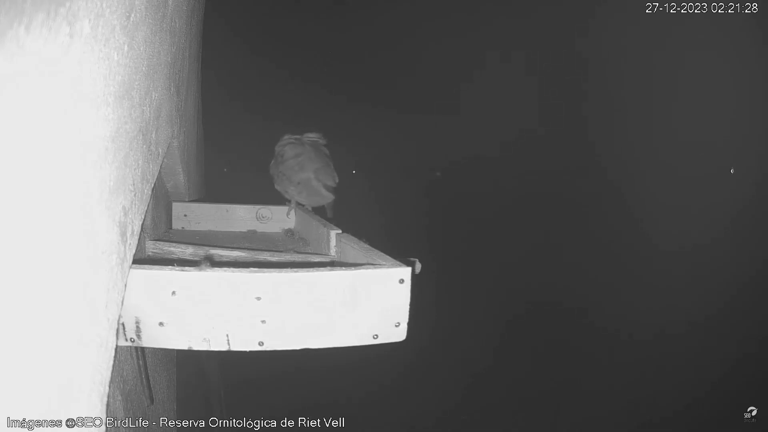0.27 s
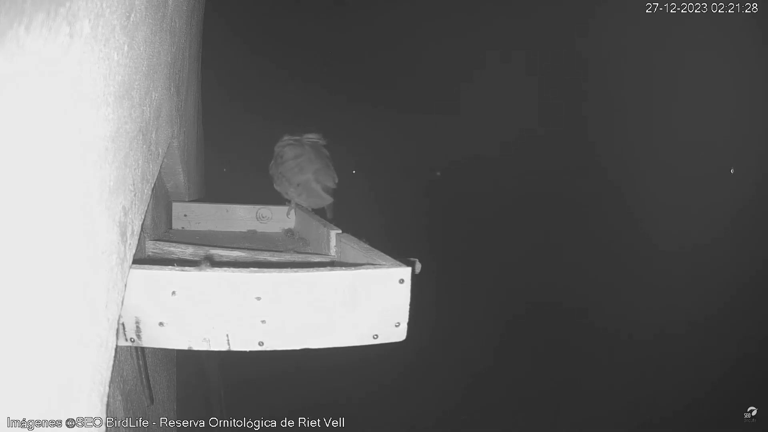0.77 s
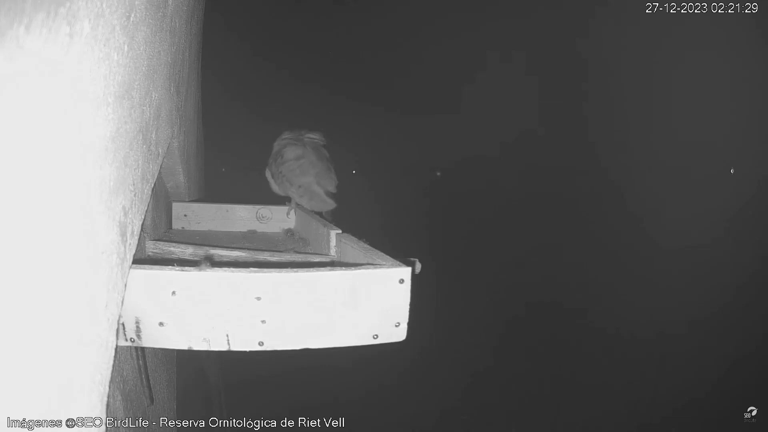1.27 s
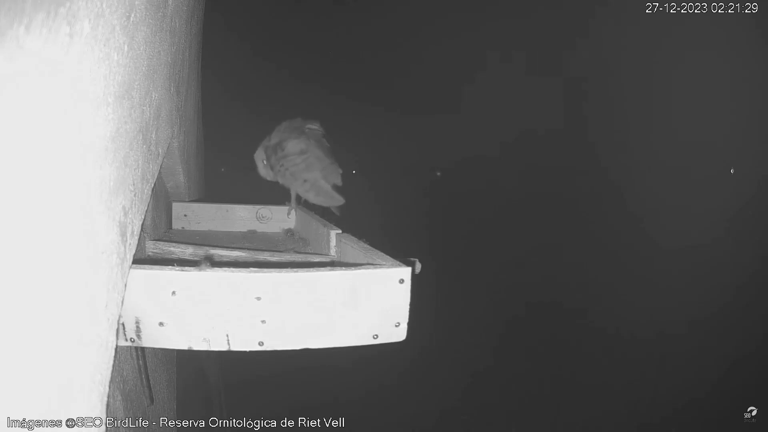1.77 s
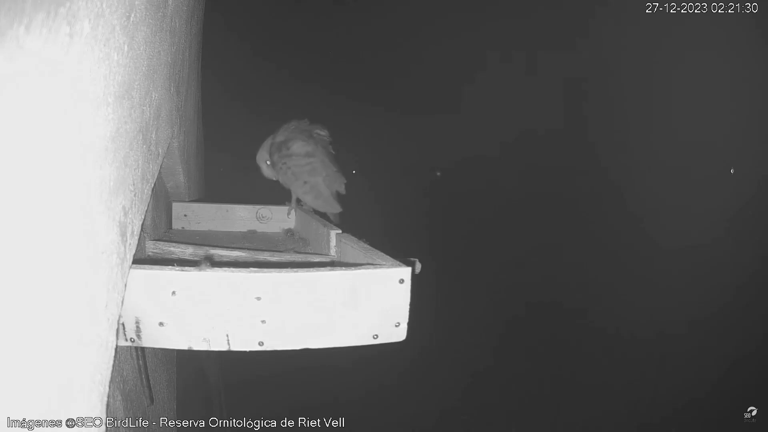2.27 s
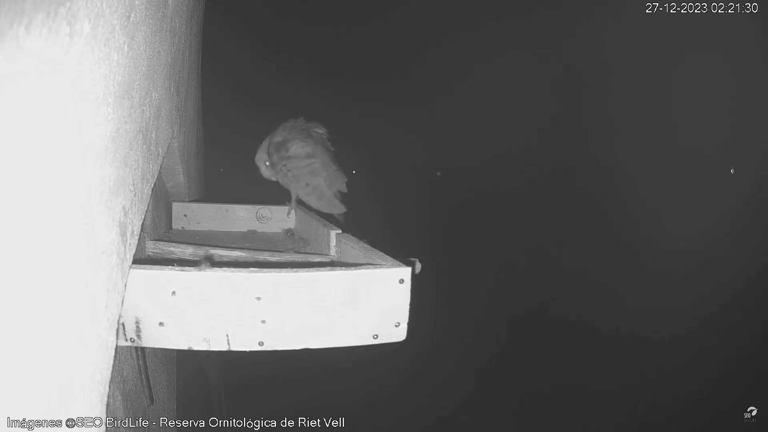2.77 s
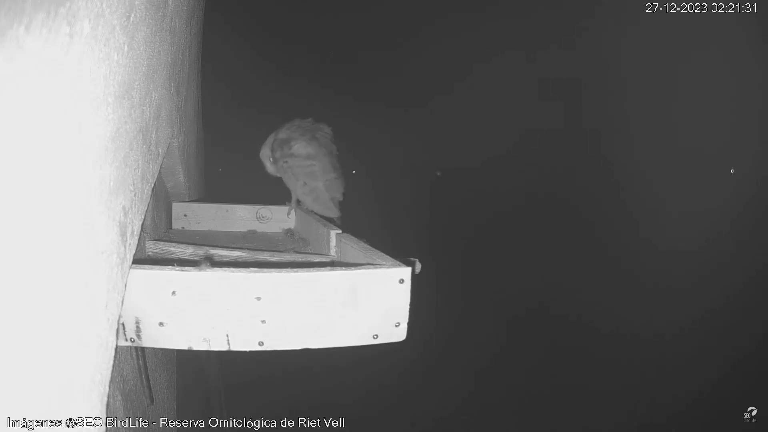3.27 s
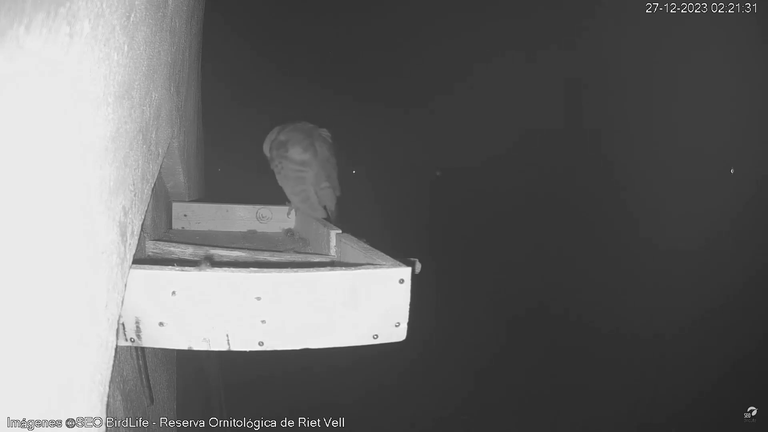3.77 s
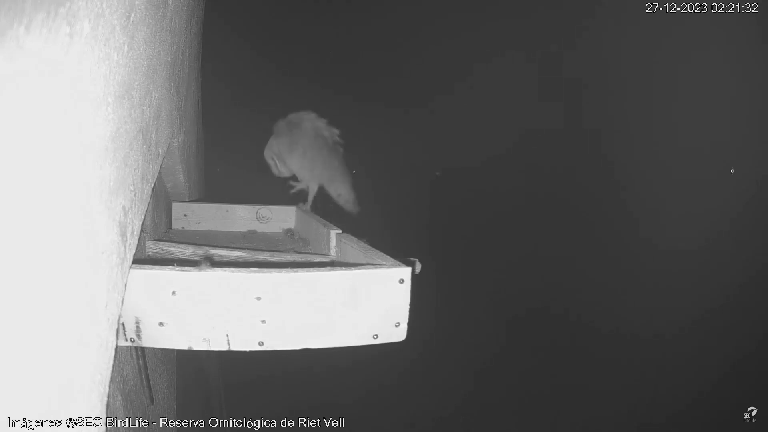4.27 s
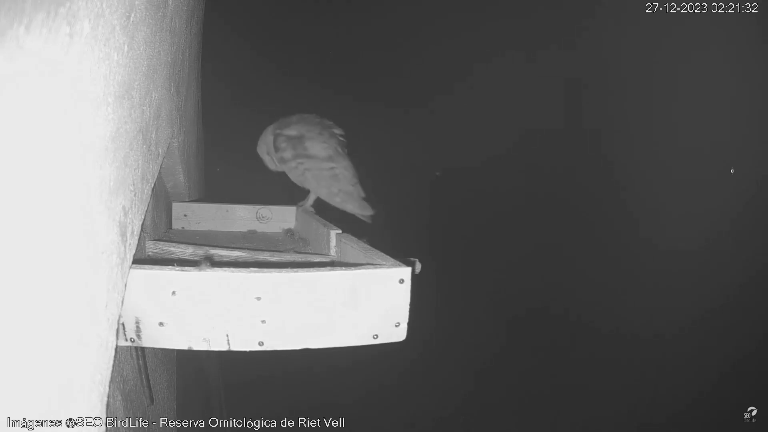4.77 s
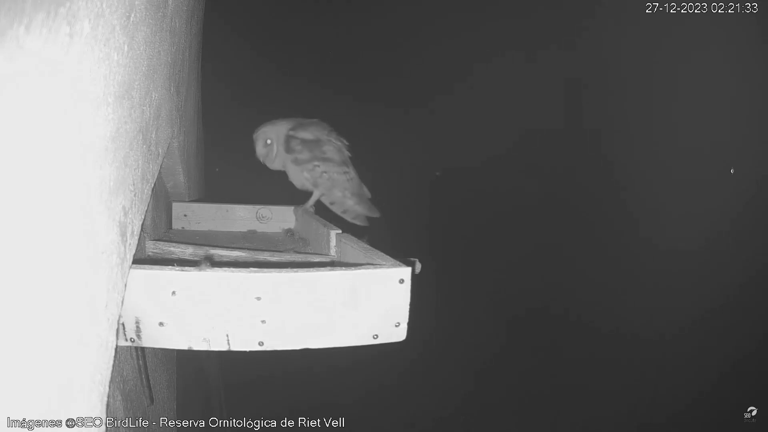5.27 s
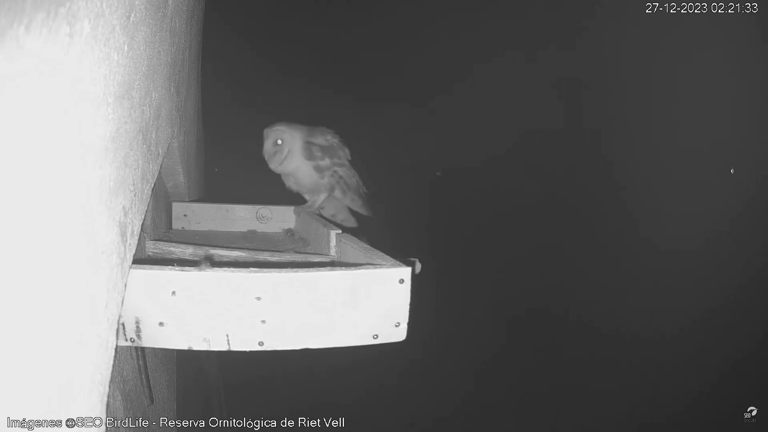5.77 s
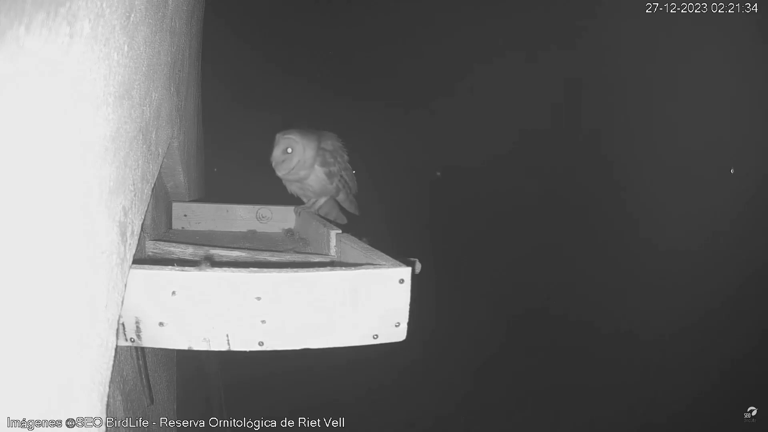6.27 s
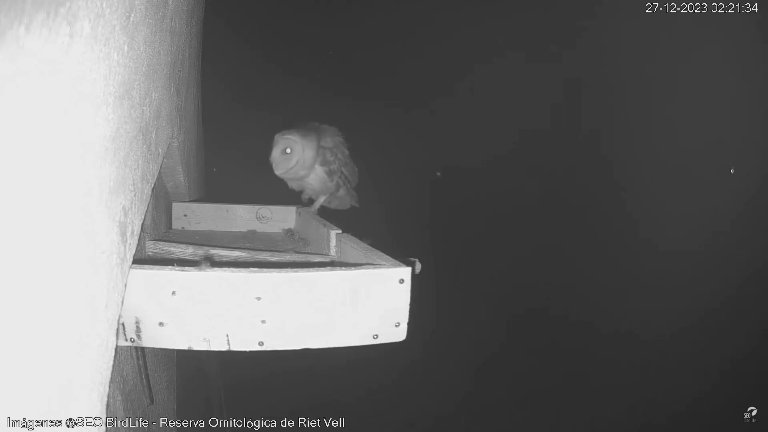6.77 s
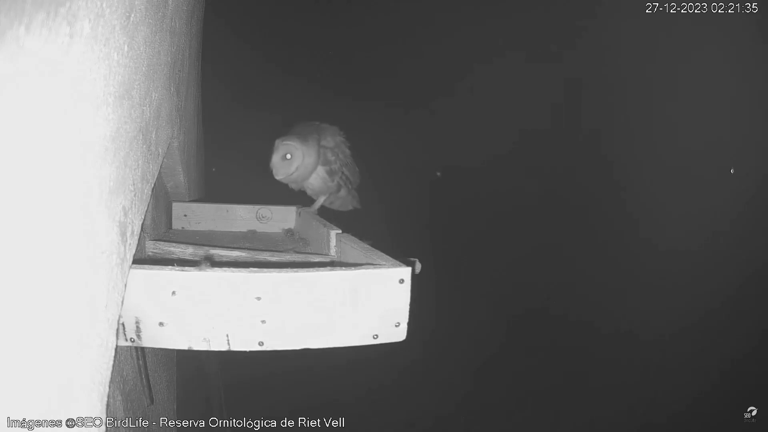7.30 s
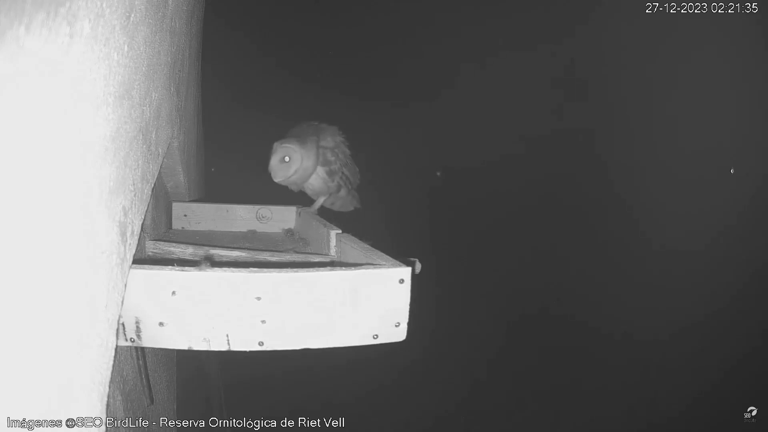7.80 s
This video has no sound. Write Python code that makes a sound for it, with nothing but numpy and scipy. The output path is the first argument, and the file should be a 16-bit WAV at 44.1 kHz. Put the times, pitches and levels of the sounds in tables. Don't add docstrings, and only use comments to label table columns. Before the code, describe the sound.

A small mono camera microphone at a wooden nest box at night: steady soft electronic hiss, very low rumble and barely stirring air, with close dry box reflections. At 0.5 s a barn owl gives a breathy, rasping begging hiss of about half a second. Faint squeaks and claw scratches follow, then a weaker hiss at 2.4 s. A light knock comes near 3 s and a sharp tick at 3.2 s. From 3.3 to 4.1 s another owl gives a thin, airy, fluttering whistle-screech; a duller begging hiss overlaps from 3.9 to 4.6 s. Wood knocks at 4.2 s and more loudly at 4.6 s, with tiny creaks around 5.1 s. From 5.2 s a long harsh screech swells, throbbing rapidly, loudest and shrillest near 6.6 s, cutting off at 6.8 s. A box thump and fourth hiss sit under it at 5.75 s. After a quiet gap, the strongest begging hiss comes at 7.7 s, with slight squeaks.

```python
import sys
import numpy as np
from scipy import signal
from scipy.fft import rfft, irfft, next_fast_len
from scipy.io import wavfile
from scipy.ndimage import uniform_filter1d

SR = 44100
rng = np.random.default_rng(int(sys.argv[2]) if len(sys.argv) > 2 else 0)


def rack_gain(trim_db):
    fader = np.asarray(trim_db, float)
    return 10 ** (fader / 20)


def pcm_store(signal):
    levels = np.round(np.clip(np.atleast_2d(signal), -1, 1) * 32767)
    wavfile.write(sys.argv[1], SR, levels.astype(np.int16).T)


N = 354519

# pitch_hz, level_db (per Hz)
RUMBLE_SPECTRUM = [(2, -8), (5, 3), (10, 1), (17, -4), (26, -14.5), (36, -20), (50, -27), (90, -36),
                   (200, -52), (500, -77)]
STIR_SPECTRUM = [(60, -23), (150, -3), (300, -2), (600, -7), (1200, -12.5), (3000, -31.5)]
AMPLIFIER_SPECTRUM = [(5, 23.5), (17, 25.5), (28, 16), (60, 8), (130, 10), (400, 0.5), (1400, 1),
                      (20000, -1)]
# start_s, length_s, effort_db, swell_s, beak_open_db
BEGGING = [
    (0.521, 0.55, -33, .17, -3.5),
    (2.402, 0.6, -39.5, 0.085, -3),
    (5.75, 0.53, -35.5, 0.071, 1),
    (7.703, 0.59, -32.5, 0.076, -3),
]
TURNED_BEGGING = (3.89, 0.715, -34.5, 0.2, -14)
# pitch_hz, width_hz, level_db
FACING_MODES = [
    [(630, 340, -1.5), (1065, 400, 3.5), (1320, 650, 0)],
    [(1970, 500, -16.5), (2600, 520, -13.5), (3193, 940, -7), (3533, 670, -2), (3900, 330, -5.5)],
    [(4430, 530, -9), (4785, 700, -2.5), (5670, 410, -22)],
    [(6290, 400, 4), (6820, 710, -2.5), (7460, 350, -12.5)],
]
AWAY_MODES = [
    [(603, 240, -4), (1090, 930, 0.014), (1420, 240, 0)],
    [(1970, 710, -12), (2593, 590, -3.5), (3095, 610, -2), (3530, 540, -1), (3860, 500, -7.5)],
    [(4650, 1200, 1), (4910, 610, -15.5), (5580, 170, -5)],
    [(6250, 450, 2.5), (6840, 390, -5), (7300, 350, -16.5)],
]
# usual_db, extra_effort_share, swell_share, openness_share, early_stop_s
BREATH_RESPONSE = [
    (-52, 0.05, .85, -0.21, -.025),
    (-35, 0.91, 1.13, 0.029, 0.0059),
    (-35, 0.94, 1.8, 0.98, 0.01),
    (-57.5, .6, 3.2, .2, -0.0022),
]
# start_s, length_s,
# pitch_hz, level_db
SQUEAKS = [(4.786, 0.073, 1780, -72.5), (4.811, 0.056, 840, -72), (4.827, .02, 3600, -81),
           (5.104, 0.022, 1434, -61), (5.108, 0.017, 3050, -79), (5.12, 0.049, 1490, -65.5),
           (5.142, 0.049, 1800, -62), (5.15, 0.054, 937, -58.5), (3.201, 0.016, 2750, -64),
           (7.7, .04, 1900, -57), (7.71, .09, 700, -60), (1.164, 0.035, 310, -75), (1.297, 0.06, 259, -70)]
# start_s, box_thump_db, plank_db, knock_db, tick_db
TAPS = [
    (1.833, -89, -60, -59.5, -56.5),
    (2.268, -114, -59, -69, -60.5),
    (2.975, -96, -55, -51, -66),
    (3.217, -53.5, -63.5, -57.5, -37.5),
    (3.583, -80, -59.5, -50, -59),
    (3.796, -58.5, -55, -58, -77),
    (4.18, -81, -43.5, -48.5, -70),
    (4.568, -57.5, -39.5, -55, -70.5),
    (5.06, -80, -67, -58, -54.5),
    (5.755, -48.5, -70, -67, -53),
]
BOX_NOTE = .006, .14, 242
PLANK = .007, .11, [(330, 120, -14), (560, 110, 0), (720, 130, -1), (970, 120, -1)]
KNOCK = .005, .07, [(1250, 250, -4), (1520, 200, -2), (1810, 200, 0), (2300, 300, -8)]
TICK = .0025, .024, [(2750, 220, -7), (3300, 300, -4), (3640, 300, 0), (3950, 300, -7)]
# time_s, effort_db, upper_resonances_db (relative to effort)
THIN_COURSE = [
    (3.25, -78, -15),
    (3.272, -62, -25),
    (3.298, -48, -10),
    (3.348, -36, -18.5),
    (3.58, -28.5, -22.5),
    (3.7, -31, -20),
    (3.78, -28.5, -21),
    (4.08, -31, -25.5),
    (4.12, -59, -12.5),
]
# pitch_hz, width_hz, level_db
THIN_CORE = [(973, 480, -49.5), (1950, 590, -44.5), (2700, 350, -33.5), (3050, 190, -11), (3254, 240, -3.5),
             (3534, 320, -14), (3856, 66, -10.5), (4270, 1000, -24.5), (4554, 52, -8)]
THIN_TOP = [(5040, 290, -2), (5500, 190, -3), (6000, 130, 3), (6200, 790, -8), (6800, 330, -8),
            (7360, 180, -7.5)]
# time_s, effort_db, stage (0 start, 1 swell, 2 full cry), shrillness_db
CRY_COURSE = [
    (5.163, -70, 0., -9),
    (5.19, -46.5, 0, -9.5),
    (5.4, -39, 0.58, -18),
    (5.56, -24.5, 0.99, 2.5),
    (5.76, -24.5, 1.07, -4.5),
    (5.95, -24, 1.48, -1),
    (6.3, -25.5, 1.78, -7),
    (6.6, -19.5, 1.745, 5),
    (6.84, -22.5, 1.76, 6),
]
# pitch_hz, width_hz, start_db, swell_db, full_cry_db
CRY_MODES = [(565.3, 433, -17.5, -30, -33), (883, 350, -8, -34.5, -27.5), (1220, 380, -7.5, -24.5, -17),
             (1560, 620, -1, -19.5, -35.5), (1929, 246, -10, -12.5, 6.5), (2064, 212, -15, 0.5, -9.5),
             (2417, 320, -9, 2, -14), (2693, 830, -10, -12, -13.5), (3265, 770, -12.5, -7.5, -20),
             (3730, 316, -5.5, -11.5, -7.5), (5160, 610, -62, -67.5, -30), (5350, 910, -52, -39.5, -40.5),
             (6135, 540, -42, -49.5, -37.5)]
# time_s, rate_hz
THROB_RATE = [(5.16, 62.16), (5.4, 61.53), (5.6, 58.67), (5.8, 55.67), (6.0, 54.17), (6.2, 51.62),
              (6.4, 55.59), (6.6, 50.23), (6.84, 50.93)]
# time_s, level_db (above the neighbours)
ACCENTS = [(5.72, -4), (5.989, 4), (6.028, 3), (6.16, 4), (6.217, 4), (6.235, 4), (6.256, -3), (6.275, 4),
           (6.386, 3), (6.403, 4), (6.438, -4), (6.458, 4), (6.476, 5), (6.515, -3), (6.535, -2),
           (6.572, 1), (6.59, 2), (6.729, -6), (6.749, 4), (6.769, -5), (6.789, 3), (6.81, 5), (6.83, -8)]
# delay_s, level_db
WALL_ECHOES = [(.0006, -25.5), (.0013, -21.5), (.0023, -27), (.0083, -19), (.066, -45)]


def evened(x):
    return x / np.sqrt(np.mean(x ** 2) + 1e-20)


def coloured(x, spectrum):
    size = next_fast_len(N, True)
    hz = np.fft.rfftfreq(size, 1 / SR)
    point_hz, point_db = np.transpose(spectrum)
    gain = rack_gain(np.interp(np.log(hz + 1), np.log(point_hz + 1), point_db))
    return evened(irfft(rfft(x, size) * gain, size)[..., :N])


def add(mix, s, sound):
    part = mix[round(s * SR):][:len(sound)]
    part += sound[:len(part)]


def slow(n, hz):
    lowpass = signal.butter(2, hz, fs=SR, output="sos")
    return evened(signal.sosfilt(lowpass, rng.standard_normal(n + 4000))[4000:])


def tract(x, modes, steep=0.65, patchy_db=1.5):
    hz, _, z = signal.stft(x, SR, nperseg=1024, noverlap=768)
    power = 0
    for f, width, db in modes:
        skirt = (1 + (2 * (hz[:, None] - f) / width) ** 2) ** (2 * steep)
        power = power + rack_gain(2 * np.atleast_1d(db)) / skirt
    patches = uniform_filter1d(rng.standard_normal(z.shape), size=3, axis=0)
    patches = evened(uniform_filter1d(patches, size=7, axis=1))
    gain = np.sqrt(power / power.mean(axis=0)) * rack_gain(patchy_db * patches)
    return signal.istft(z * gain, SR, nperseg=1024, noverlap=768)[1][:len(x)]


def curves(rows):
    s, *columns = np.transpose(rows)
    t = np.arange(s[0], s[-1], 1 / SR)
    return t, [np.interp(t, s, c) for c in columns]


def rumble():
    rumble_db, stir_db = -54, -77
    lumps = rng.standard_normal(N) * rack_gain(2.5 * slow(N, hz=10))
    drift = rack_gain(rumble_db) * coloured(rng.standard_normal(N), RUMBLE_SPECTRUM)
    return drift + rack_gain(stir_db) * coloured(lumps, STIR_SPECTRUM)


def amplifier_hiss(shape):
    return rack_gain(-68.5) * coloured(rng.standard_normal(shape), AMPLIFIER_SPECTRUM)


def begging_hiss(start, length, effort_db, swell_s, open_db, groups):
    usual_db, start_db, onset_s, fade_s = -35, -13.5, .019, .034
    t = np.arange(0, length + .05, 1 / SR)
    air = rng.standard_normal(len(t)) * rack_gain(0.37 * slow(len(t), hz=121))
    out = np.zeros(len(t))
    for (db, extra, swell, opening, early_s), modes in zip(BREATH_RESPONSE, groups):
        level_db = db + extra * (effort_db - usual_db) + opening * open_db
        level_db = level_db + swell * start_db * np.exp(-t / swell_s)
        level_db -= 30 * np.exp((t - length + early_s) / fade_s)
        out += rack_gain(level_db) * evened(tract(air, modes, steep=1.9, patchy_db=2.2))
    return start, out * np.minimum(t / onset_s, 1) ** 2


def squeak(s, length, hz, db):
    n = round(length * SR)
    pitch = hz * (1 + 0.039 * slow(n, hz=150))
    tone = np.sin(2 * np.pi * np.cumsum(pitch) / SR)
    return s, rack_gain(db) * 1.7 * tone * np.hanning(n)


def tap(s, thump_db, plank_db, knock_db, tick_db):
    t = np.arange(9000) / SR
    stretch = 2.2 if tick_db < -46 else 1
    tick = stretch * TICK[0], stretch * TICK[1], TICK[2]
    parts = [(*BOX_NOTE[:2], np.sin(2 * np.pi * BOX_NOTE[2] * t))]
    for rise, t60, modes in (PLANK, KNOCK, tick):
        parts.append((rise, t60, tract(rng.standard_normal(len(t)), modes, steep=1.5)))
    out = np.zeros(len(t))
    for db, (rise, t60, sound) in zip((thump_db, plank_db, knock_db, tick_db), parts):
        part = sound * (1 - np.exp(-(t / rise) ** 2)) * rack_gain(-60 * t / t60)
        out += rack_gain(db) * 1.47 * part / abs(part).max()
    return s - .003, out


def thin_screech():
    t, (effort_db, top_db) = curves(THIN_COURSE)
    flutter_hz, flutter_depth = 57 * (1 + 0.12 * slow(len(t), hz=15)), 0.38
    flutter = np.cos(2 * np.pi * np.cumsum(flutter_hz) / SR)
    spurts_db = 4.4 * flutter_depth * flutter + 1.5 * slow(len(t), hz=45)
    air = evened(rng.standard_normal(len(t)) * rack_gain(spurts_db))
    frame_s = signal.stft(t, SR, nperseg=1024, noverlap=768)[1]
    opening = np.exp(-(frame_s / .06) ** 2)
    modes = []
    for f, width, db in THIN_CORE:
        shift_db = 20 * (2500 < f < 2900) - 9 * (3150 < f < 3350)
        modes.append((f, width, db + opening * shift_db))
    core = evened(tract(air, modes, steep=1.8))
    swing = uniform_filter1d(abs(signal.hilbert(core)), size=60)
    core = evened(core / (1 + (swing / 1.7) ** 2) ** .36)
    top = evened(tract(air, THIN_TOP))
    return t[0], rack_gain(effort_db) * core + rack_gain(effort_db + top_db) * top


def throbs(t, effort_db):
    first_s, jitter_ms, scatter_db = 5.172, .4, .9
    turns = np.cumsum(np.interp(t, *np.transpose(THROB_RATE))) / SR
    turns -= np.interp(first_s, t, turns)
    at = t[1:][np.diff(np.floor(turns)) > 0]
    jitter, scatter = rng.standard_normal((len(at), 2)).T
    peak_db = np.interp(at, t, effort_db) + scatter_db * scatter
    for s, db in ACCENTS:
        k = abs(at - s).argmin()
        peak_db[k] = np.interp(s, t, effort_db) + db
    return at + jitter_ms / 1000 * jitter, peak_db


def long_screech():
    t, (effort_db, stage, shrill_db) = curves(CRY_COURSE)
    throb_ms = np.interp(stage, range(3), (2.9, 3.6, 2.1))
    clear = np.interp(stage, range(3), (0.83, .8, .93)).clip(.65, .95)
    gap_db = -7.3 - .42 * shrill_db
    at, peak_db = throbs(t, effort_db)
    near = np.searchsorted((at[1:] + at[:-1]) / 2, t)
    since = t - at[near]
    shape = np.exp(-.5 * abs(1000 * since / throb_ms.clip(2, 3.7)) ** 2.3)
    bumps = rack_gain(peak_db[near] + 0.56) * shape

    peaks_db = np.interp(t, np.r_[t[0], at], np.r_[effort_db[0], peak_db])
    stop_s = .003
    lead_db = (effort_db + peaks_db) / 2 - 30 * np.exp((t - t[-1]) / stop_s)
    between = rack_gain(uniform_filter1d(lead_db, size=500) + gap_db + 1.2 * slow(len(t), hz=90.8))
    shut_after_ms, shut_ms, shut_depth = 6.5, 1.5, .5
    between *= 1 - shut_depth * np.exp(-((1000 * since - shut_after_ms) / shut_ms) ** 2)
    puff_level = np.hypot(between * (1 - .75 * shape), np.sqrt(1 - clear) * bumps)
    puffs = puff_level * rng.standard_normal(len(t))

    hz, width = np.array([mode[:2] for mode in CRY_MODES]).T
    mode_db = np.array([np.interp(stage, range(3), db) + shrill_db * (f > 4500) for f, w, *db in CRY_MODES])
    frame_count = signal.stft(t, nperseg=1024, noverlap=768)[1].size
    frames = (256 * np.arange(frame_count)).clip(0, len(t) - 1)
    voice = tract(puffs, zip(hz, width, mode_db[:, frames]), steep=1.51, patchy_db=2.5)

    share = rack_gain(1.04 * mode_db) * np.sqrt(width)[:, None]
    share /= np.linalg.norm(share, axis=0)
    detune, slip = rng.standard_normal((len(at), len(hz), 2)).T
    tone_hz = hz[:, None] + 0.21 * width[:, None] * detune
    phase = np.cumsum(1.5 * slip, axis=0)
    tones = np.cos(2 * np.pi * tone_hz[:, near] * since + phase[:, near])
    ring = (share * np.sqrt(2) * tones).sum(axis=0)
    throb_power = np.bincount(near, (shape * ring) ** 2) / np.bincount(near, shape ** 2)
    ring /= np.sqrt(throb_power)[near]
    return t[0], voice + np.sqrt(clear) * bumps * ring


def box(x):
    t, t60, wet_db = np.arange(8000) / SR, .15, -37
    burst = rng.standard_normal(len(t)) * rack_gain(-60 * t / t60) * (t > .004)
    tail = signal.lfilter([1], [1, -.6], burst)
    tail *= rack_gain(wet_db) / np.linalg.norm(tail)
    tail[0] = 1
    for k, (s, db) in enumerate(WALL_ECHOES):
        tail[round(s * SR)] += (-1) ** k * rack_gain(db)
    return signal.fftconvolve(x, tail / np.linalg.norm(tail))[:N]


def scene():
    near = np.zeros(N)
    for row in BEGGING:
        add(near, *begging_hiss(*row, FACING_MODES))
    add(near, *begging_hiss(*TURNED_BEGGING, AWAY_MODES))
    for row in SQUEAKS:
        add(near, *squeak(*row))
    for row in TAPS:
        add(near, *tap(*row))
    add(near, *thin_screech())
    add(near, *long_screech())
    return np.tile(box(near) + rumble(), (2, 1))


def low_pass(x):
    return signal.sosfilt(signal.butter(12, 15720, fs=SR, output="sos"), x)


def record(dry):
    edge_hz = 7600
    narrow = signal.oaconvolve(dry, signal.firwin(255, edge_hz, fs=SR)[None], "same")
    return low_pass(narrow + amplifier_hiss(dry.shape))


dry = scene()
out = record(dry)
pcm_store(out)
```